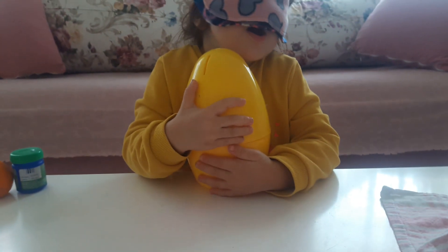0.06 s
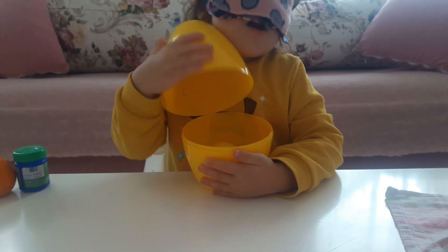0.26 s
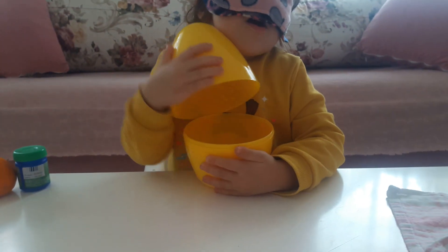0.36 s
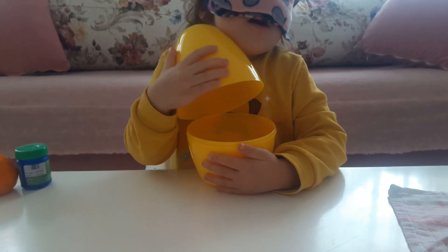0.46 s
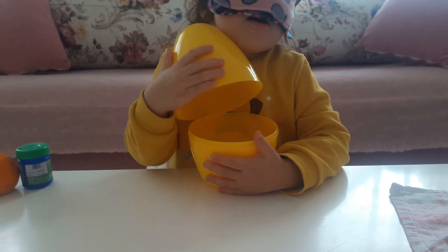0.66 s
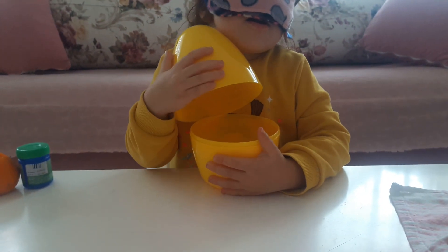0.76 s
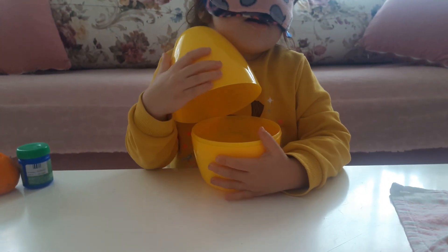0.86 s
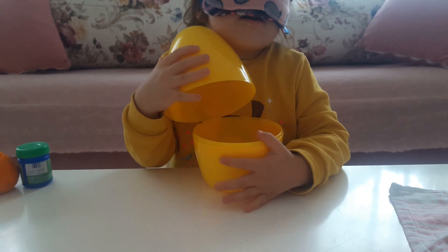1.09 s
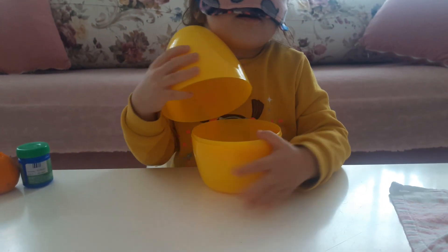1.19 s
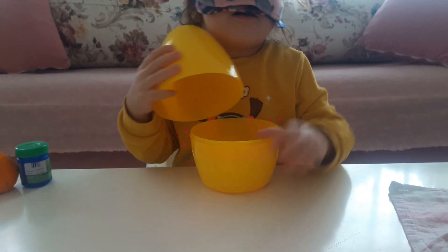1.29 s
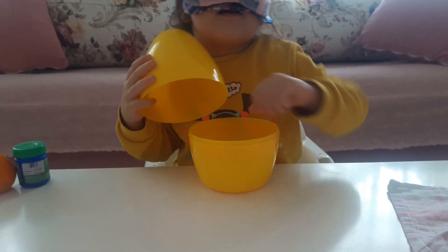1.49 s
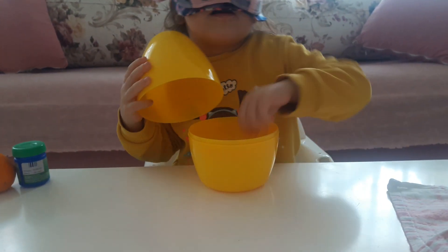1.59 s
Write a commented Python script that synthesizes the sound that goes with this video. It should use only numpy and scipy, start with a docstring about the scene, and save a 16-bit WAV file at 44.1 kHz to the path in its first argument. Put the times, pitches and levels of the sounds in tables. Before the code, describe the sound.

Big plastic egg shell pulled apart: hard snap and hollow knock, fainter taps and hand rubs after

```python
"""In a quiet furnished room, over soft room tone, a large hollow plastic egg is pulled open above a table.
The rim cracks apart in sharp edge clicks, the shell pops and knocks, and the table top thuds: ringing modes
struck with a crack of noise. Further clicks and knocks follow, then hands rub in strokes of grainy hiss and rumble.
The lower half rocks and rings like a bowl, and a faint narrow hiss fades in, sinking in pitch.
A microphone with two ports hears it all, with the room's noise-like answer behind."""
import sys
import numpy as np
from scipy import signal
from scipy.fft import rfft, irfft, next_fast_len
from scipy.io import wavfile
from scipy.ndimage import map_coordinates

SR = 44100
rng = np.random.default_rng(int(sys.argv[2]) if len(sys.argv) > 2 else 0)


def unload_audio(sound):
    """Save the sound as a 16-bit wav file, at the path given as the first command line argument."""
    columns = np.transpose(np.atleast_2d(sound))
    # keep every value between -1 and 1, then stretch to whole-number steps
    steps = np.round(np.clip(columns, -1, 1) * 32767)
    wavfile.write(sys.argv[1], SR, steps.astype(np.int16))


def field_ratio(decibels):
    """Amplitude ratio for a level in dB (20 dB per decade); scalars and array-likes work."""
    return 10 ** (np.asarray(decibels, dtype=float) / 20)


N = 72765  # samples

# resonances of the plastic edge, clicked or rubbed: (frequency [Hz], relative level [dB])
EDGE_MODES = [(1850, 1.5), (2100, 1), (2600, -4), (3080, 1), (3300, -0.5), (3700, 1.5), (4350, 3),
              (5000, 1), (6300, -1), (7700, -1), (11200, -4.5), (12900, -10.5)]
# how alike diffuse sound is at the two ports: (frequency [Hz], left-right likeness [-1 to 1])
PORT_LIKENESS = [(150, 1), (600, 0.69), (2000, 0.1)]


def unit(x):
    """Scale to rms 1."""
    return x / np.sqrt(np.mean(x ** 2) + 1e-20)


def along(points, hz):
    """Interpolate (Hz, value) points on a log frequency axis."""
    f, v = np.transpose(points)
    return np.interp(np.log(hz + 1), np.log(f + 1), v)


def filtered(x, response):
    """Filter x by a complex response of frequency."""
    m = next_fast_len(x.shape[-1] + 8192)
    spectrum = rfft(x, m) * response(np.fft.rfftfreq(m, 1 / SR))
    return irfft(spectrum, m)[..., :x.shape[-1]]


def wobble(rate):
    """A smooth random curve, rate knots a second."""
    knots = rng.standard_normal(int(N * rate / SR) + 4)
    return map_coordinates(knots, [np.arange(N) * rate / SR])


def paired(pair, alike):
    """Mix two unrelated signals into left and right of the given likeness."""
    turn = lambda hz: np.arccos(np.clip(along(alike, hz), -1, 1)) / 2
    mid, side = filtered(pair, lambda hz: np.array([np.cos(turn(hz)), np.sin(turn(hz))]))
    return np.array([mid + side, mid - side])


def noise(spectrum):
    """Coloured noise of rms 1."""
    return unit(filtered(rng.standard_normal(N), lambda hz: field_ratio(along(spectrum, hz))))


def favour(hz, centre_hz, breadth):
    """Gain that falls away from a favoured pitch, 9 dB down at breadth octaves."""
    octaves = np.abs(np.log2((hz + 1) / centre_hz))
    return field_ratio(-9 * (octaves / breadth) ** 1.3)


def struck(blows, modes, attack_cycles, crack_db, floor=0):
    """Every blow rings the same modes, most those near its favoured pitch, with a short crack of noise.

    The higher a mode, the more its phase can differ between left and right. The third row is what the
    room hears from all sides: the same energy as one smooth-coloured pulse.
    """
    mode_scatter_db, port_scatter_rad_per_khz, crack_t60_s = 1.5, .07, .012
    out, t = np.zeros((3, N + SR)), np.arange(SR // 2) / SR
    hz, level, t60 = np.transpose(modes)[:, :, None]
    for s, db, centre_hz, breadth in blows:
        near = lambda f: favour(f, centre_hz, breadth) + floor
        scatter, skew = rng.standard_normal((2, *hz.shape))
        decay = field_ratio(level + mode_scatter_db * scatter - 60 * t / t60)
        body = decay * near(hz) * (1 - np.exp(-t * hz / attack_cycles))
        shift = port_scatter_rad_per_khz * hz / 1000 * skew
        ring = np.array([(body * np.sin(2 * np.pi * hz * t + side * shift)).sum(axis=0) for side in (1, -1)])

        hiss = paired(filtered(rng.standard_normal((2, len(t))), near), PORT_LIKENESS)
        crack = unit(hiss) * field_ratio(crack_db - 60 * t / crack_t60_s) * (1 - np.exp(-t * centre_hz))
        direct = ring / np.abs(ring).max() + crack

        pulse = filtered(signal.unit_impulse(len(t), round(SR / centre_hz)), near)
        spread = unit(pulse) * np.sqrt(np.mean(direct ** 2))
        out[:, round(s * SR):][:, :len(t)] += field_ratio(db) * np.vstack([direct, spread])
    return out[:, :N]


def room_tone():
    """Steady coloured noise of the quiet room, more alike at the two ports in the bass."""
    # colour of the room tone: (frequency [Hz], relative level [dB per Hz])
    air = [(15, -77), (25, -14.5), (97, -0.5), (962, -15), (16000, -37)]
    likeness = [(100, 0.48), (1000, 0.33), (8000, .1)]  # (frequency [Hz], left-right likeness)
    return field_ratio(-64.5) * paired(np.array([noise(air), noise(air)]), likeness)


def edge_clicks():
    """The rim and edges snap: short high modes, of which a snap excites even those far from its pitch."""
    # clicks: (time [s], level of the ring's peak [dB], favoured pitch [Hz], breadth [octaves])
    clicks = [(.211, -18, 1290, 1.34), (.2145, -9, 1980, 1.13), (.2205, -20, 5830, 0.26),
              (.2902, -13.5, 3240, 0.57), (.3932, -17, 3150, 0.79), (.5187, -33.5, 3600, 0.88),
              (.5637, -42, 2180, 0.36), (.5968, -34, 2690, 0.577), (.628, -38.5, 2900, 1.04),
              (.654, -44.5, 3300, 0.54), (1.0845, -47.5, 3300, 0.75), (1.247, -34, 2700, 0.42),
              (1.301, -51, 4440, .9), (1.3115, -40, 2640, 0.58), (1.323, -52.5, 3100, 0.38),
              (1.529, -45.5, 2424, 1.04)]
    t60_s, snap_floor_db = .014, -35.5
    modes = [(hz, db, t60_s) for hz, db in EDGE_MODES]
    return struck(clicks, modes, attack_cycles=1.2, crack_db=-9, floor=field_ratio(snap_floor_db))


def shell_knocks():
    """The hollow shell pops and knocks: its modes each die within the same number of cycles."""
    # knocks: (time [s], level of the ring's peak [dB], favoured pitch [Hz])
    knocks = [(0.2117, -13.5, 913), (.214, -14.5, 254.6), (0.228, -21, 201), (.2405, -16, 618),
              (.2432, -7, 507), (.286, -16.5, 748), (.3935, -27, 570), (.519, -33.5, 550),
              (0.522, -31.5, 293), (0.563, -30.5, 518), (.5735, -36, 558), (0.5982, -39.5, 506),
              (.601, -36.5, 225), (0.63, -42, 1074), (.658, -41, 284.6), (0.951, -53, 600),
              (.985, -49, 475), (1.031, -50.5, 700), (1.085, -61, 600), (1.0935, -47, 648),
              (1.1017, -48.5, 520), (1.132, -46, 682), (1.2424, -37, 543), (1.2461, -29.5, 624),
              (1.25, -29.5, 430), (1.3115, -33.5, 620), (1.314, -33, 216), (1.592, -47, 224)]
    # modes of the hollow shell: (frequency [Hz], relative level [dB])
    shell = [(130, 4), (200, 5), (255, -1), (410, 10), (520, 8.5), (665, 12.5), (800, 9.5), (1010, 8)]
    t60_cycles, breadth_oct = 13, .42
    modes = [(hz, db, t60_cycles / hz) for hz, db in shell]
    blows = [(*knock, breadth_oct) for knock in knocks]
    return struck(blows, modes, attack_cycles=.6, crack_db=-18)


def table_thuds():
    """The lower half jolts the table, whose top rings in two low modes."""
    # jolts: (time [s], level of the ring's peak [dB])
    thuds = [(0.215, -29.5), (0.244, -28.5)]
    # modes of the table top: (frequency [Hz], relative level [dB], time to fall 60 dB [s])
    table = [(86, 0, .6), (112, -4, .45)]
    blows = [(s, db, 100, 2) for s, db in thuds]  # favoured pitch Hz, breadth octaves
    return struck(blows, table, attack_cycles=1.1, crack_db=-58.5)


def room(x):
    """The room's answer from all around: noise in which each frequency dies at its own speed."""
    # reverberation: (frequency [Hz], time to fall 60 dB [s])
    reverberation = [(100, .6), (400, .5), (2000, .48), (6000, .38), (11000, .2)]
    predelay_s = .004
    hz, t, z = signal.stft(rng.standard_normal((2, SR)), SR, nperseg=256)
    fading = z * field_ratio(-60 * t / along(reverberation, hz)[:, None])
    tail = paired(signal.istft(fading, SR, nperseg=256)[1], PORT_LIKENESS)
    late = np.pad(x, (round(predelay_s * SR), 0))[None]
    return signal.fftconvolve(late, tail / np.linalg.norm(tail[0]), axes=1)[:, :N]


def hands():
    """Skin drags over plastic and table in swelling strokes: grainy hiss in the edge's modes, and low rumble."""
    # strokes: (middle [s], length [s], hiss level [dB], rumble level [dB], favoured pitch [Hz])
    scrapes = [(.9, 0.36, -72.5, -66, 3500), (0.956, 0.01, -59, -62.5, 3230),
               (1.016, 0.023, -55, -63, 3240), (1.097, 0.033, -63, -55.5, 3860),
               (1.239, 0.028, -56.5, -62.5, 3960), (1.268, .12, -63.5, -63, 3820),
               (1.415, 0.039, -56.5, -90, 3870)]
    # colour of the rumble: (frequency [Hz], relative level [dB per Hz])
    rumble_colour = [(60, -17.5), (130, -6), (450, -5), (900, -16), (1800, -35.5)]
    breadth_oct, edge_q = .62, 22
    s, length, hiss_db, rumble_db, pitch_hz = np.transpose(scrapes)[:, :, None]
    swell = np.exp(-(2 * (np.arange(N) / SR - s) / length) ** 2)

    grain = field_ratio(3 * wobble(450))
    edge = lambda f: np.sqrt(sum(1 / (1 + (2 * edge_q * (f / hz - 1)) ** 2) for hz, _ in EDGE_MODES))
    hiss = 0
    for centre_hz, level in zip(pitch_hz, field_ratio(hiss_db) * swell):
        colour = lambda f: edge(f) * favour(f, centre_hz, breadth_oct)
        rub = filtered(rng.standard_normal((2, N)) * grain, colour)
        hiss = hiss + unit(paired(rub, [(1000, 1.0)])) * level  # the same at both ports

    bumps = field_ratio(4 * wobble(60))
    rumble = unit(noise(rumble_colour) * bumps) * (field_ratio(rumble_db) * swell).sum(axis=0)
    return hiss + rumble


def bowl_rings():
    """The lower half rocks and rings like a bowl, in a few low modes that last longer than the shell's."""
    # taps: (time [s], level of the ring's peak [dB])
    taps = [(1.256, -40), (1.316, -39)]
    # modes of the lower half: (frequency [Hz], relative level [dB], time to fall 60 dB [s])
    bowl = [(199, -3, .15), (349, 0, .38), (420, -8, .15)]
    blows = [(s, db, 280, 2) for s, db in taps]  # favoured pitch Hz, breadth octaves
    return struck(blows, bowl, attack_cycles=0.52, crack_db=-18)


def narrow_hiss():
    """Faint noise in a narrow band that fades in late, sinking in pitch as it comes."""
    from_s, rise_s = 1.335, 0.21
    settled_hz, fall_hz, width_hz = 1860, 300, 190
    rise = np.clip((np.arange(N) / SR - from_s) / rise_s, 0, 1)
    band = filtered(rng.standard_normal((2, N)), lambda hz: np.exp(-(hz / width_hz) ** 2))
    phase = 2 * np.pi * np.cumsum(settled_hz + fall_hz * (1 - rise) ** 2) / SR
    hiss = unit(band[0] * np.cos(phase) + band[1] * np.sin(phase))
    return field_ratio(-68.5) * hiss * np.sqrt(rise)


def scene():
    """Egg, table and hands heard directly and by way of the room, over the room tone."""
    # phase of the direct sound, left ahead of right: (frequency [Hz], angle between the ports [rad])
    port_angle = [(100, 0.05), (3600, .5), (5000, 1.5)]
    air = room_tone()
    blows = edge_clicks() + shell_knocks() + table_thuds() + bowl_rings()
    skin = hands()
    near = blows[:2] + skin
    spread = blows[2] + skin[0]
    ports = lambda hz: np.exp(.5j * along(port_angle, hz) * np.array([[1], [-1]]))
    return filtered(near, ports) + field_ratio(-10.5) * room(spread) + narrow_hiss() + air


def low_pass(x):
    """Removes everything above the highest recorded frequency."""
    return signal.sosfilt(signal.butter(12, 16440, fs=SR, output="sos"), x)


def record(dry):
    """The microphone colours the treble, cuts the deep bass, and its right port is the more sensitive."""
    # port balance: (frequency [Hz], left over right [dB])
    lean = [(60, -4.5), (300, -1.5), (1200, -4), (3500, -6), (8000, -3)]
    # treble colour of the microphone: (frequency [Hz], gain [dB])
    mic = [(7000, 1.5), (9800, -2), (13000, 7.5)]
    low_cut_hz, top_hz = 52, 16300

    def response(hz):
        """Port gains, a triple first-order bass cut and a sharp upper limit."""
        gain = field_ratio(along(lean, hz) * np.array([[.5], [-.5]]) + along(mic, hz))
        return gain / (1 - 1j * low_cut_hz / (hz + 1)) ** 3 * (hz < top_hz)

    mix = filtered(dry, response)
    return low_pass(mix)


dry = scene()
out = record(dry)
unload_audio(out)
```